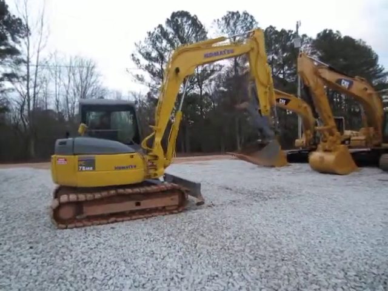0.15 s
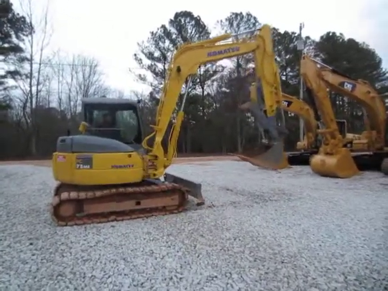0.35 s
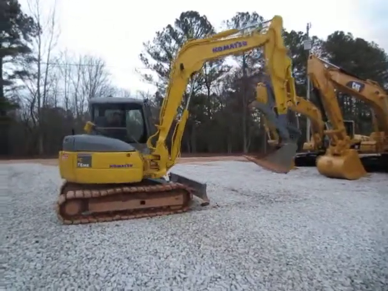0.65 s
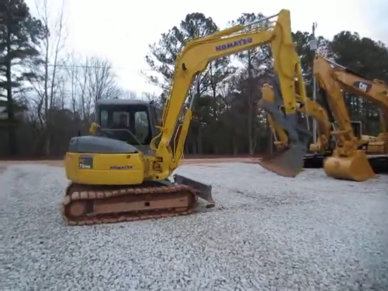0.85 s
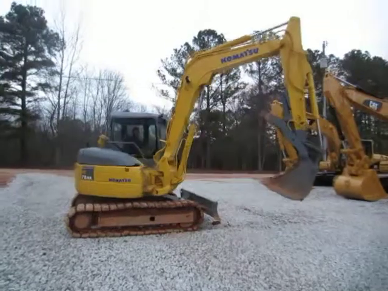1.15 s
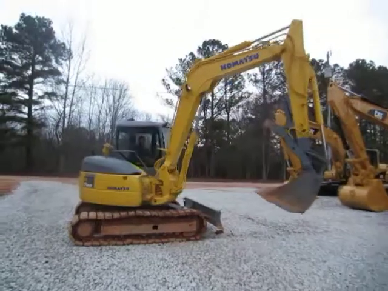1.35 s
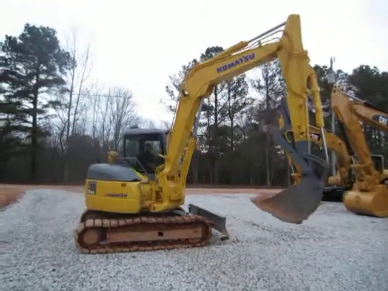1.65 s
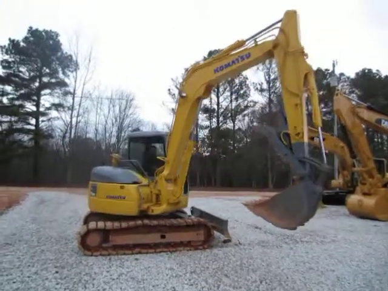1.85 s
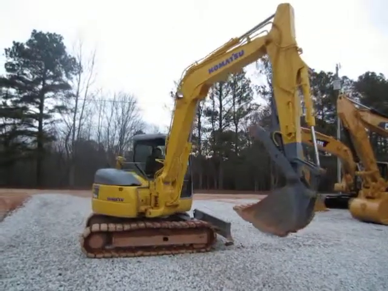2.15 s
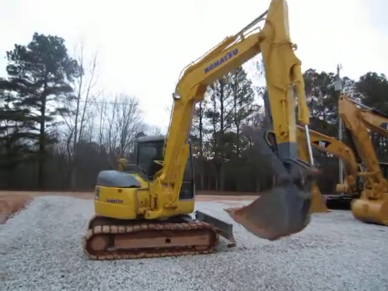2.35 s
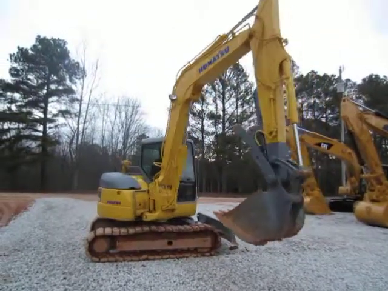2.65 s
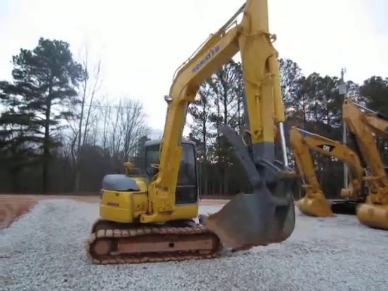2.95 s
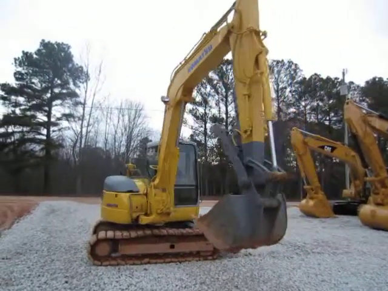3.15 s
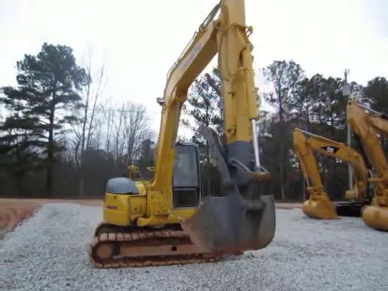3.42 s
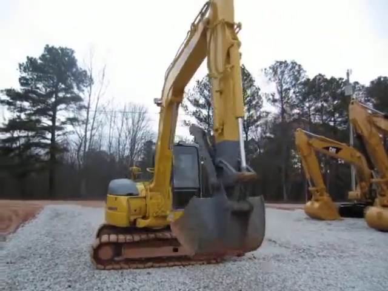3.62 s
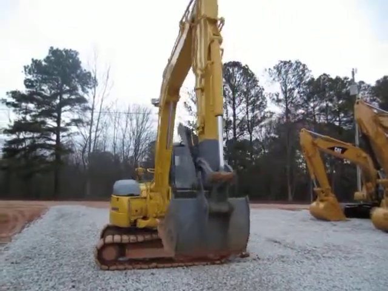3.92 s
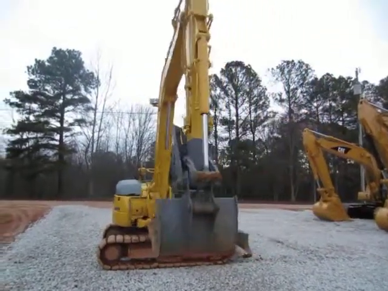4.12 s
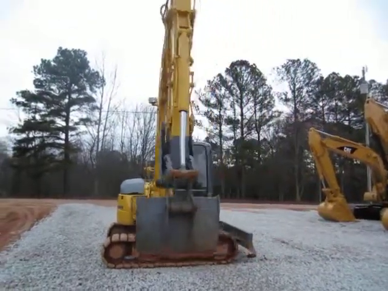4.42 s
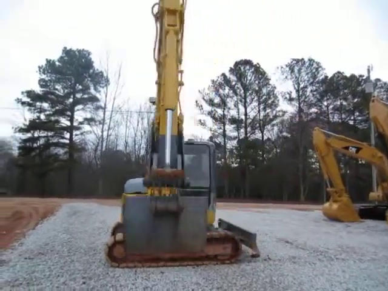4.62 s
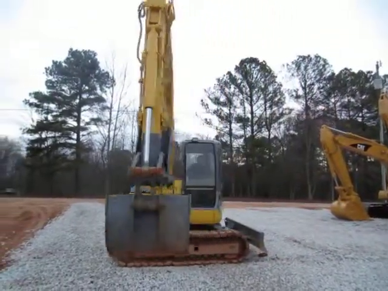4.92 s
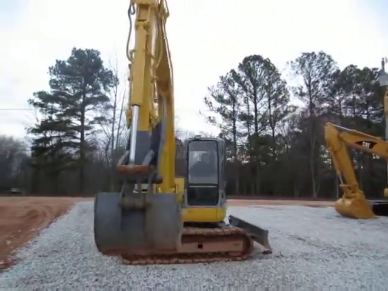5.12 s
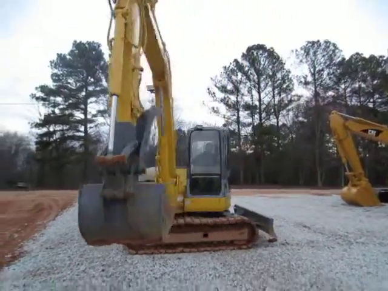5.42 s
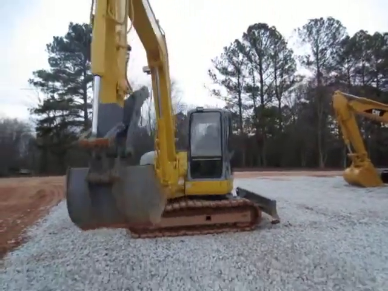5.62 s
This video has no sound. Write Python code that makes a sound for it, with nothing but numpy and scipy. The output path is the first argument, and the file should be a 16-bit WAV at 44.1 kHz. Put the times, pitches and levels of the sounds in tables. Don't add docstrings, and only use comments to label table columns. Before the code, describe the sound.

A compact excavator's diesel engine runs throughout in an open gravel yard, heard through a small stereo microphone with no wind protection. Its speed creeps up very slightly in the first second, then holds: a low drone near 68 Hz, quick repeating clatter, rough exhaust roar, soft pulsing hiss and very faint high pump whistles. It is brightest and fullest around 0 to 1 s, its tone shifting slowly as the body turns. A light breeze adds low rumble, with a brief pop on the left at 0.6 s and soft bumps near 2.8 and 3.1 s. From 3.3 s hard gusts thump and overload the microphone; the engine ducks at 3.4, 4.05 and 4.4 s, recovering between. From 4.05 to 4.9 s dense fluttering, crackling knocks hit mainly left, fewer and duller right. The engine is most muffled around 4.9 to 5.2 s, then begins to brighten, with scattered lighter wind thuds until 5.77 s.

```python
import sys
import numpy as np
from scipy import signal
from scipy.fft import rfft, irfft
from scipy.io import wavfile
from scipy.ndimage import uniform_filter1d

SR = 44100
rng = np.random.default_rng(int(sys.argv[2]) if len(sys.argv) > 2 else 0)


def waveform_to_disk(signal):
    frames = np.transpose(np.atleast_2d(signal))
    scaled = np.clip(frames, -1, 1) * 32767
    samples = np.round(scaled).astype(np.int16)
    wavfile.write(sys.argv[1], SR, samples)


def invert_db(x):
    u = np.asarray(x, float) / 20
    return 10 ** u


N = 254456

# time in seconds, cycles per second (four firings a cycle).
CYCLES_PER_S = [(0, 16.76), (.35, 16.89), (.65, 17.02), (1.0, 17.08), (1.4, 17.1), (3.0, 17.11),
                (5.77, 17.12)]
FIRST_FIRING_CYCLES = .07
CYLINDER_DB = [-6.5, -7.5, -6.5, -3.5]
FIRING_DB, FIRING_FACING_DB, FIRING_SHADED_SHARE, HUNT_DB = -23.5, 3.5, .4, .4
FAN_DB, FAN_FACING_DB, FAN_SHADED_SHARE = -35, 7.5, .25
GRILLE_FACES_S, GRILLE_SPAN_S = .4, 1.1

# frequency in Hz, level in dB per Hz.
ROAR_SPECTRUM = [(15, -47.5), (30, -25.5), (60, -8.5), (110, -3.5), (200, 0), (330, -6.5), (400, -12.5),
                 (560, -12.5), (680, -14), (790, -9), (900, -18), (1100, -25.5), (1500, -30.5),
                 (1950, -38.5)]
# frequency in Hz, level in dB per Hz.
HISS_SPECTRUM = [(1700, -20), (2250, -3.5), (2600, -7), (3200, -9.5), (3600, -14), (4700, -14),
                 (6000, -20.5), (7000, -24), (7600, -35.5), (8000, -34), (8700, -26.5), (10500, -20),
                 (14200, -19.5), (15700, -21.5)]
# frequency in Hz, level in dB.
CLATTER_SPECTRUM = [(30, -24), (100, -8), (200, -15.5), (330, -13.5), (400, -34), (560, -23), (680, -15.5),
                    (800, -24.5), (1050, -23.5), (1450, -38.5), (1750, -29.5), (2300, -49.5), (3000, -59.5)]
ROAR_DB, HISS_DB, CLATTER_DB = -18, -50, -22.5
STRONG_ORDERS = [6, 8, 9, 10, 12, 20, 30, 31, 37, 38, 39, 40, 44, 46, 48, 51, 56, 57, 58, 60, 62, 68, 72,
                 73, 80, 83, 85, 90, 95, 99, 131, 133]
STRONG_DB = [-0.5, 6, 0.5, 3, 8, -7.5, -1, 3, 9.5, 1.5, 5, 7, 13.5, 9.5, 1.5, 8.5, 5.5, 7, 4.5, 7, 5.5, 2,
             6.5, 8.5, 8.5, 13, 11.5, 4, 5, 3.5, 7.5, 4]

# time in seconds, treble shade in dB.
SHADE = [(0, 0), (.5, -3), (1.2, 0), (2.8, -1.1), (3.4, -3), (4.1, -6.5), (4.6, -13), (4.88, -15),
         (5.1, -15), (5.3, -14.5), (5.77, -10.5)]
# frequency in Hz, share of the lift.
BEND_SHARE = [(100, 0.73), (300, 0.87), (700, 0.41), (1500, 0.22), (3000, 0.01)]
BASS_BENDS_SHARE, BASS_LIFT_DB = 0.61, -0.37
# time faced in seconds, span in seconds,
# pitch then in Hz, glide in Hz per second, level in dB.
WIDE_OPENINGS = [(0.37, 1.13, 493, 55, 8.5), (0.24, 0.63, 1225, 70, 6), (1.64, 1.4, 1410, 20, 6.5),
                 (3.3, 0.37, 730, 5, 2.5), (5.4, 0.41, 890, 5, 3.5), (5.5, .45, 1600, 5, 2),
                 (0.54, 0.75, 2160, 5, 4.5), (0.93, 0.71, 1600, 190, -4), (0.74, 1, 970, 150, -5.5),
                 (3.84, 0.28, 1480, 5, 5.5), (4.6, .3, 1500, 5, -2.5), (1.3, 0.22, 140, 10, 0.5),
                 (2.0, 0.53, 245, 67, 4.5), (3.17, 0.24, 254, 5, 6), (1.69, 0.38, 665, 76, 4),
                 (1.35, 0.24, 950, 90, 4), (.5, .6, 6000, 5, 4), (4.9, 0.44, 4000, 5, 2.5),
                 (5.2, 0.28, 290, 5, 4), (4.7, 0.28, 3200, 5, -5), (.3, .4, 10000, 5, 3),
                 (4.9, .2, 4200, 5, -5.5), (4.95, .25, 9500, 5, -3.5), (0.43, .25, 150, 5, -9)]
# time faced in seconds, span in seconds,
# pitch then in Hz, glide in Hz per second, level in dB.
NARROW_OPENINGS = [(0.26, 0.59, 654, -9, 12.5), (3.34, 0.74, 934, 39, 12), (0.41, 0.48, 773, 3.5, 7),
                   (1.7, .5, 2100, 18, -0.5), (4, 1, 1200, 4.5, -5), (4.3, 0.88, 1047, 5, 7),
                   (3.1, 1.8, 1950, 3.5, -7.5), (0.2, 0.74, 1060, 6, 10.5), (0.56, 0.83, 520, 74.5, 6.5),
                   (1.9, 0.38, 610, 21, 1), (3.6, .35, 2100, 3, 3), (2.3, 0.83, 490, 4.5, 0.5),
                   (2.8, .5, 4850, 4, 1), (2.3, 0.46, 1600, 4, -3.5)]
WIDE_WIDTH, NARROW_WIDTH = 0.11, 0.035
PATH_FRAME_SAMPLES = 1024

# frequency in Hz, left minus right in dB.
BALANCE_DB = [(60, -1), (300, -1.5), (740, -2.5), (1130, -5), (1500, -7), (2000, 4), (2800, -3), (3500, 1),
              (5000, 4), (7000, 2), (8000, 1), (10000, 5), (14000, 5), (15700, 1)]
# frequency in Hz, correlation from 0 to 1.
LIKENESS = [(60, 0.96), (300, 1), (900, 1), (1500, 0.97), (2600, 0.51), (6000, 0.52), (12000, 0.38)]
# frequency in Hz, lead of the left in radians.
LEAD_RAD = [(50, 0), (700, .15), (1290, .3), (1640, 1.5), (1890, 2.0), (2150, -.5), (2760, .3)]

# frequency in Hz, left level in dB, right level in dB.
WHINES = [
    (4791, -84, -84),
    (15735, -95, -77),
]
# frequency in Hz, width in Hz, level in dB, share of the shade.
WHISTLES = [(2245, 14, -60.5, 0.83), (2417, 30, -68.5, .9), (4840, 60, -74, .95), (14280, 130, -82, .95)]

# time in seconds, level in dB, bite from 0 to 3.
BREEZE = [(0, -34.5, 0.66), (1.5, -30, 0.44), (2.4, -37.5, 0.55), (2.9, -27.5, .5), (3.3, -17.5, 0.39),
          (3.6, -21.5, 0.83), (3.9, -21, 0.67), (4.4, -20.5, 1.1), (4.8, -22.5, 1.2), (5.1, -30.5, 1.05),
          (5.77, -20.5, 0.087)]
# time in seconds, length in seconds, level in dB, bite from 0 to 3 (more acts
GUSTS_LEFT = [(0.605, 0.012, -11, 1.34), (2.82, 0.039, -13.5, 0.67), (3.03, 0.12, -29, 1.3),
              (3.135, 0.023, -14, .05), (3.284, 0.016, -6, 0.98), (3.375, 0.047, -7.5, 1.17),
              (3.58, 0.04, -20, .98), (3.75, 0.018, -13, .3), (3.828, 0.031, -7.5, 0.81),
              (3.87, 0.15, -13.5, 1.03), (4.068, 0.027, -11, 3.5), (4.122, 0.02, -14, 1.5),
              (4.143, 0.024, -12.5, 2.4), (4.2, 0.066, -15.5, 1.48), (4.25, 0.035, -19.5, 3.1),
              (4.278, 0.0092, -18, 1.5), (4.369, 0.012, -15, 1.5), (4.39, 0.037, -11, 2.7),
              (4.458, 0.028, -14, 2), (4.503, 0.033, -13, 1.76), (4.646, 0.027, -17, 1.7),
              (4.669, 0.017, -15, 1.8), (4.755, 0.015, -15, 1.54), (4.774, 0.02, -12, 1.87),
              (4.797, 0.015, -15, 1.47), (4.829, 0.031, -14.5, 2.5), (4.883, 0.011, -10.5, 1.53),
              (5.074, 0.043, -19, 2.04), (5.155, 0.062, -19, 1.05), (5.35, 0.052, -19, 1.05),
              (5.595, 0.038, -14, 0.77), (5.715, 0.023, -24, 1.8)]
# time in seconds, length in seconds, level in dB, bite from 0 to 3.
GUSTS_RIGHT = [(0.976, 0.08, -27, 0.91), (1.575, 0.025, -23, .3), (1.753, 0.1, -27, 0.36),
               (3.488, 0.021, -19, 1.1), (3.682, 0.021, -15, 0.88), (3.882, 0.096, -19, 0.91),
               (3.954, 0.037, -10, .3), (4.003, 0.03, -13.5, 0.055), (4.22, 0.018, -19.5, 0.93),
               (4.255, 0.035, -15.5, .6), (4.393, 0.027, -5.5, 1.2), (4.47, 0.038, -15.5, 1.07),
               (5.311, 0.034, -27, 0.78), (5.474, 0.021, -24, 0.83)]
GUST_EDGE = 3.6
# bite from 0 to 3, rumble in dB, flutter in dB, crackle in dB.
EDDY_MIX = [
    (0, 1, -27, -37),
    (1, -1.5, -6, -23),
    (2, -21.5, 2, -8.5),
    (3, -10.5, -3.5, -1.5),
]
# time in seconds, push as share of full scale (+ inward), width in ms.
KNOCKS_LEFT = [(3.275, 0.86, 2.9), (3.362, 0.53, 3.1), (3.366, -0.48, 5.2), (3.3799, -0.57, 1.1),
               (3.3914, -0.067, 2.2), (3.517, -0.37, 2.5), (3.5692, 0.32, 3.2), (3.5791, 0.36, 1.9),
               (3.629, -0.26, 1.6), (3.8298, 0.55, 2.4), (4.0547, -0.3, 1.3), (4.0577, 0.57, 0.93),
               (4.0677, 0.55, 0.72), (4.076, 0.69, 0.9), (4.0869, 0.25, 1.5), (4.1015, 0.37, 2),
               (4.1333, 0.27, 0.83), (4.1414, 0.46, 1.1), (4.1484, 0.52, 1.2), (4.1843, 0.33, 1.2),
               (4.2235, -0.32, 1.2), (4.258, -0.74, 1.24), (4.273, 0.47, 1.8), (4.2785, -0.61, 1.34),
               (4.38, -0.61, 0.94), (4.386, 0.66, 1.9), (4.39, 0.69, 1.7), (4.395, -0.56, 1.2),
               (4.4015, 0.42, .9), (4.4576, 0.65, 2.1), (4.4732, -0.65, 1.9), (4.501, -0.42, 1),
               (4.5124, 0.73, 2), (4.6448, -0.48, 2.4), (4.6507, 0.78, 1.28), (4.67, 0.42, 1.6),
               (4.768, 0.57, 1.07), (4.7724, 0.52, 1.3), (4.8107, 0.78, 1.5), (4.8252, 0.17, 1.5),
               (4.8338, -0.71, 0.95), (5.0617, 0.36, 2.4), (5.0672, 0.13, 1.6), (5.0889, 0.52, 1.8),
               (5.156, 0.3, 1.8), (5.3467, 0.47, 2.3), (5.358, 0.24, 3.4), (5.3812, 0.13, 2),
               (5.5873, -0.31, 2.6), (5.5975, -0.3, 4.6)]
# time in seconds, push as share of full scale (+ inward), width in ms.
KNOCKS_RIGHT = [(3.275, 0.54, 3), (3.353, -0.12, 1.5), (3.3659, -0.26, 3.4), (3.4916, -0.3, 1.9),
                (3.6822, -0.43, 2.7), (3.8075, 0.46, 2.2), (3.952, 0.46, 3.8), (4.222, 0.19, 2.4),
                (4.228, 0.55, 2.5), (4.256, -0.57, 2.6), (4.3875, -0.53, 3), (4.398, 0.57, 1.5),
                (4.555, 0.27, 2.3), (4.6211, 0.15, 2.3), (4.7711, -0.3, 2), (4.9337, 0.23, 3.2),
                (5.323, -0.33, 3.5), (5.4906, -0.082, 4.4)]
LULL_SHARE = [
    [.6],
    [.85],
    [0.2],
]
LULL_S = 0.0052
# time in seconds, tick in dB, push as share of full scale, port (0 left, 1 right), edge (0
OVERLOADS = [(3.279, -34, -.7, 0, 0), (3.371, -22, .8, 0, 1.3), (3.395, -40, .5, 0, 0),
             (3.4404, -49, .05, 1, .3), (3.6683, -41, .05, 1, .5), (4.0578, -33, .25, 0, .7),
             (4.1326, -49, .05, 1, .3), (4.3856, -52, .02, 0, .3), (4.4006, -38, -.3, 1, .7),
             (4.4246, -52, .02, 0, .3), (4.5373, -45, .05, 0, .5), (4.5372, -50, .02, 1, .5),
             (5.3495, -52, .02, 1, .3)]
SLAP_HZ, SLAP_S = 162, 0.0038
# time in seconds, drop in dB.
DUCKS = [
    (3.378, 5.5),
    (4.064, 4.5),
    (4.41, 1.5),
]
DUCK_ATTACK_S, DUCK_RECOVER_S = .012, 0.28


def rms_one(x):
    return x / np.sqrt(np.mean(x ** 2) + 1e-20)


def in_time(rows, t=None):
    s, *columns = np.transpose(rows)
    at = np.arange(N) / SR if t is None else t
    return [np.interp(at, s, column) for column in columns]


def at_hz(points, hz):
    point_hz, value = np.transpose(points)
    return np.interp(np.log(hz + 1), np.log(point_hz + 1), value)


def coloured(x, spectrum):
    hz = np.arange(N // 2 + 1) * SR / N
    below, above = (spectrum[0][0] / 2, -90), (spectrum[-1][0] * 1.3, -110)
    closed = [below] + list(spectrum) + [above]
    return rms_one(irfft(rfft(x) * invert_db(at_hz(closed, hz)), N))


def drift(rate_hz, count):
    knots = rng.standard_normal((count, 400))
    place = np.arange(N) / SR * rate_hz
    return np.array([np.interp(place, np.arange(400), k) for k in knots]) * 1.22


def band(x, low_hz, high_hz):
    return signal.sosfilt(signal.butter(2, [low_hz, high_hz], "band", fs=SR, output="sos"), x)


def facing(t, at_s, span_s):
    return np.exp(-((t - at_s) / span_s) ** 2)


def ducking(t):
    gain_db = 0
    for s, drop_db in DUCKS:
        attack = np.clip((t - s) / DUCK_ATTACK_S + .5, 0, 1)
        gain_db = gain_db - drop_db * attack * np.exp(-np.maximum(t - s, 0) / DUCK_RECOVER_S)
    return gain_db


def to_ports(shared, apart):
    overlap = PATH_FRAME_SAMPLES * 3 // 4
    hz, t, (mid, side) = signal.stft(np.array([shared, apart]), SR, nperseg=PATH_FRAME_SAMPLES, noverlap=overlap)
    shade_db = in_time(SHADE, t)[0]
    bend_db = at_hz(BEND_SHARE, hz)[:, None] * (BASS_LIFT_DB - BASS_BENDS_SHARE * shade_db)
    path_db = ducking(t) + shade_db + bend_db
    for openings, width in ((WIDE_OPENINGS, WIDE_WIDTH), (NARROW_OPENINGS, NARROW_WIDTH)):
        for s, span_s, pitch_hz, glide, db in openings:
            centre_hz = np.maximum(pitch_hz + glide * (t - s), 1)
            off = np.log((hz[:, None] + 1) / centre_hz) / width
            path_db = path_db + db * facing(t, s, span_s) * np.exp(-off ** 2)
    alike = np.clip(at_hz(LIKENESS, hz), 0, 1)[:, None]
    common, own = np.sqrt((1 + alike) / 2) * mid, np.sqrt((1 - alike) / 2) * side
    port = (invert_db(at_hz(BALANCE_DB, hz) / 2) * np.exp(.5j * at_hz(LEAD_RAD, hz)))[:, None]
    pair = np.array([(common + own) * port, (common - own) / port]) * invert_db(path_db)
    return signal.istft(pair, SR, nperseg=PATH_FRAME_SAMPLES, noverlap=overlap)[1][:, :N]


def firing_and_fan_tones(cycle):
    shade_db = in_time(SHADE)[0]
    t = np.arange(N) / SR
    faces = facing(t, GRILLE_FACES_S, GRILLE_SPAN_S)
    firing_db = FIRING_DB + FIRING_FACING_DB * faces + FIRING_SHADED_SHARE * shade_db
    firing_db = firing_db + ducking(t) + HUNT_DB * drift(9.1, count=1)[0]
    fan_db = FAN_DB + FAN_FACING_DB * faces + FAN_SHADED_SHARE * shade_db
    firing = np.sqrt(2) * invert_db(firing_db) * np.sin(2 * np.pi * 4 * cycle)
    fan = np.sqrt(2) * invert_db(fan_db) * np.sin(2 * np.pi * 20 * cycle)
    return (firing + fan) * invert_db([[-.6], [.6]])


def clatter(cycle, change):
    size, orders, strong = 2 ** 16, np.arange(1, 180), np.array(STRONG_ORDERS)
    steady_hz = CYCLES_PER_S[-1][1]
    level_db = at_hz(CLATTER_SPECTRUM, orders * steady_hz) + 1.3 * rng.standard_normal(len(orders))
    level_db[strong - 1] = at_hz(CLATTER_SPECTRUM, strong * steady_hz) + STRONG_DB
    level_db[3] = -60
    turns = rng.random((5, len(orders)))
    lines = invert_db(level_db) * np.exp(2j * np.pi * turns)
    patterns = irfft(np.pad(lines, ((0, 0), (1, 0))), size)
    played = patterns[:, (cycle % 1 * size).astype(int)]
    variants = np.sum(drift(5.0, count=4) * played[1:], axis=0)
    return rms_one(played[0] + change * variants)


def puffs(cycle, depth, sharp):
    firing = 4 * cycle
    strength = invert_db(np.array(CYLINDER_DB))[firing.astype(int) % 4]
    return 1 + depth * strength * np.exp(-sharp * (firing % 1))


def gated_noise(gate, spectrum, db):
    return [invert_db(db) * coloured(white * gate, spectrum) for white in rng.standard_normal((2, N))]


def engine():
    cycle = np.cumsum(in_time(CYCLES_PER_S)[0]) / SR + FIRST_FIRING_CYCLES
    tones = firing_and_fan_tones(cycle)
    knocking = invert_db(CLATTER_DB) * clatter(cycle, change=0.6)
    roar = gated_noise(puffs(cycle, depth=0.18, sharp=5.6), ROAR_SPECTRUM, ROAR_DB)
    hiss = gated_noise(puffs(cycle, depth=0.96, sharp=4.1), HISS_SPECTRUM, HISS_DB)
    return to_ports(roar[0] + hiss[0] + knocking, roar[1] + hiss[1]) + tones


def whines():
    t, shade_db = np.arange(N) / SR, in_time(SHADE)[0]
    out = np.zeros((2, N))
    for hz, left_db, right_db in WHINES:
        out += np.sqrt(2) * invert_db([[left_db], [right_db]]) * np.sin(2 * np.pi * hz * t) * invert_db(shade_db)
    swells = invert_db(2.0 * drift(3.6, count=len(WHISTLES)))
    for (hz, width_hz, db, shaded_share), swell in zip(WHISTLES, swells):
        narrow = rms_one(band(rng.standard_normal(N), hz - width_hz / 2, hz + width_hz / 2))
        out += invert_db(db + shaded_share * shade_db) * swell * narrow * invert_db([[1.5], [-1.5]])
    return out * invert_db(ducking(t))


def eddies(low_hz, high_hz, per_s, even_s):
    struck = rng.random(N) < per_s / SR
    kicks = struck * np.clip(0.53 + rng.standard_normal(N), -1.4, 1.6)
    kicks = kicks + 0.027 * rng.standard_normal(N)
    x = band(band(kicks, low_hz, high_hz), low_hz / 2, high_hz * 1.02)
    x = signal.sosfilt(signal.butter(6, 2000, fs=SR, output="sos"), x)
    return x / np.sqrt(uniform_filter1d(x ** 2, int(even_s * SR)) + 1e-12)


def eddy_levels(db, bite):
    return db + np.array(in_time(EDDY_MIX, bite))


def wind(gusts):
    t = np.arange(N) / SR
    power = invert_db(2 * eddy_levels(*in_time(BREEZE))) * invert_db(2.0 * drift(30.0, count=1))
    spread = np.array([[.6], [.5], [.42]])
    for s, length_s, db, bite in gusts:
        near = slice(int((s - .2) * SR), int((s + .2) * SR))
        swell = np.exp(-np.abs((t[near] - s) / (spread * length_s)) ** GUST_EDGE)
        power[:, near] += invert_db(2 * eddy_levels(db, bite))[:, None] * swell
    rumble = eddies(28, 122.4, per_s=730, even_s=0.023)
    flutter = eddies(120, 423, per_s=420, even_s=0.015)
    crackle = eddies(280, 1022, per_s=480, even_s=0.011)
    return np.sqrt(power) * [rumble, flutter, crackle]


def knocked(layers, knocks):
    out, pushes = layers.copy(), np.zeros(N)
    for s, push, width_ms in knocks:
        near = np.arange(int((s - .02) * SR), int((s + .02) * SR))
        u = (near / SR - s) * 2000 / width_ms
        out[:, near] *= 1 - np.clip(LULL_SHARE, 0, 1) * facing(near / SR, s, LULL_S)
        pushes[near] += push * (1 - u ** 2) * np.exp(-u ** 2 / 2)
    return out.sum(axis=0) + pushes


def overloads():
    dull, bright, slaps = np.zeros((3, 2, N))
    t = np.arange(N) / SR
    for s, db, push, port, edge in OVERLOADS:
        dull[port, round(s * SR)] = invert_db(db + 12)
        bright[port, round(s * SR)] = invert_db(db + 10) * edge
        slaps[port] += push * facing(t, s, SLAP_S) * np.cos(2 * np.pi * SLAP_HZ * (t - s))
    return band(dull, 2500, 8000) + band(bright, 9500, 15500) + slaps


def scene():
    machine = engine() + whines()
    left = knocked(wind(GUSTS_LEFT), KNOCKS_LEFT)
    right = knocked(wind(GUSTS_RIGHT), KNOCKS_RIGHT)
    return machine + np.array([left, right]) + overloads()


def roll_off(x):
    return signal.sosfilt(signal.butter(12, 15800, fs=SR, output="sos"), x)


def record(dry):
    rounded = dry / (1 + dry ** 12) ** (1 / 12)
    return roll_off(rounded)


dry = scene()
out = record(dry)
waveform_to_disk(out)
```